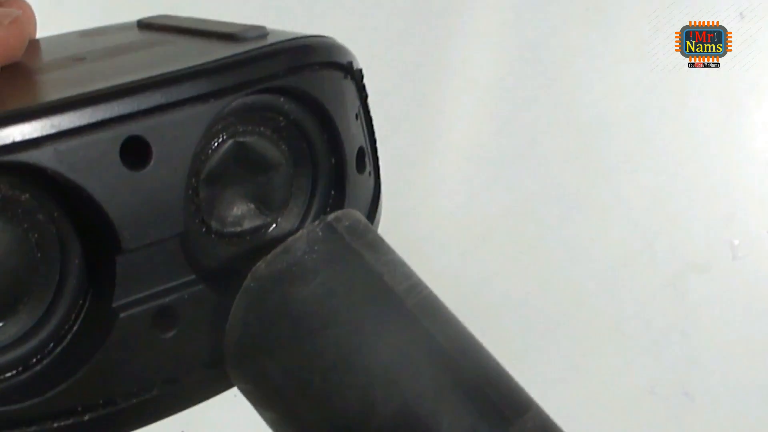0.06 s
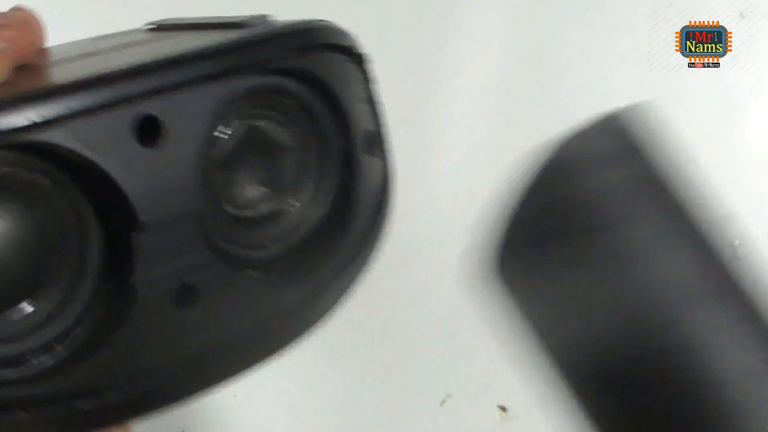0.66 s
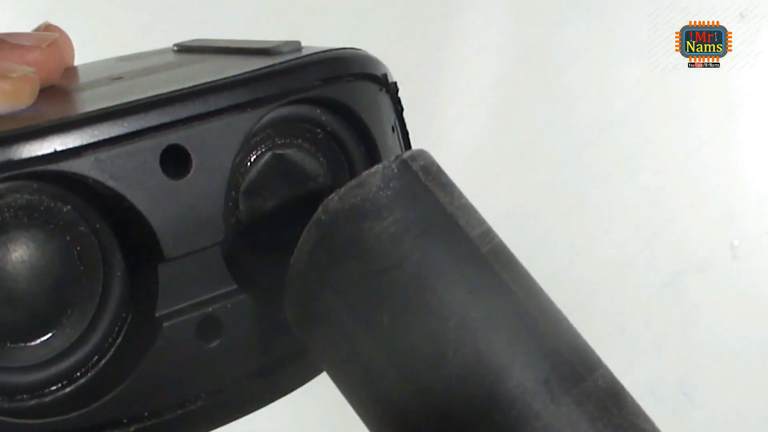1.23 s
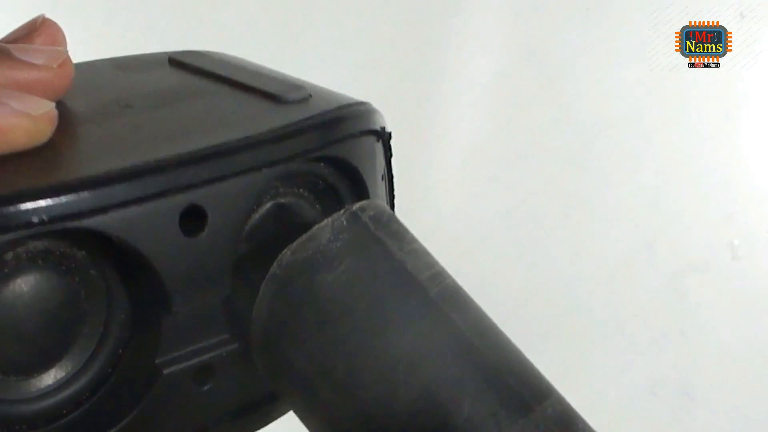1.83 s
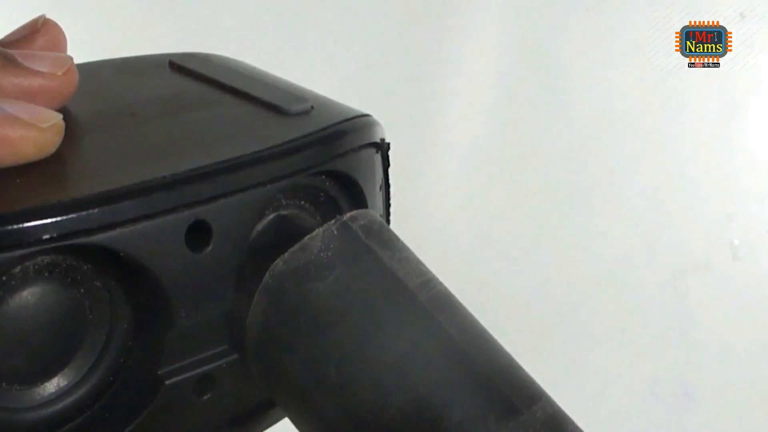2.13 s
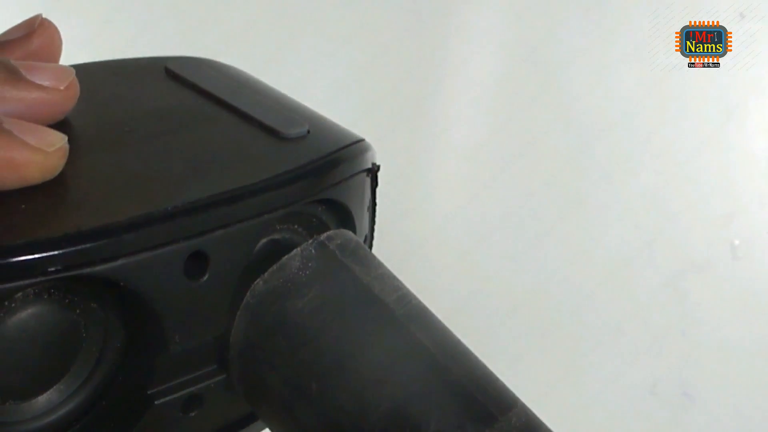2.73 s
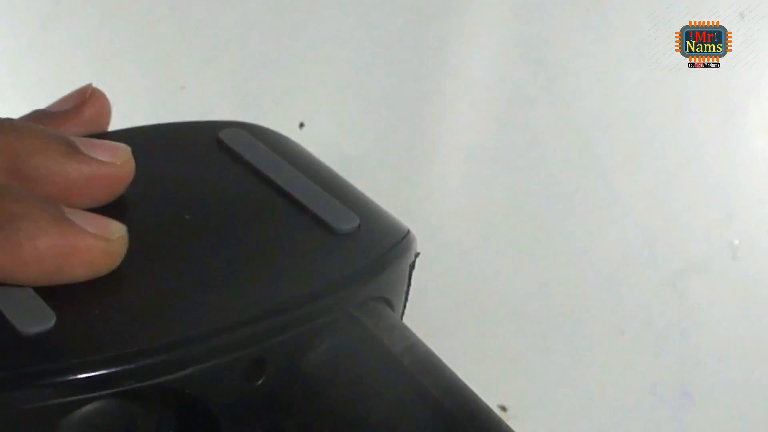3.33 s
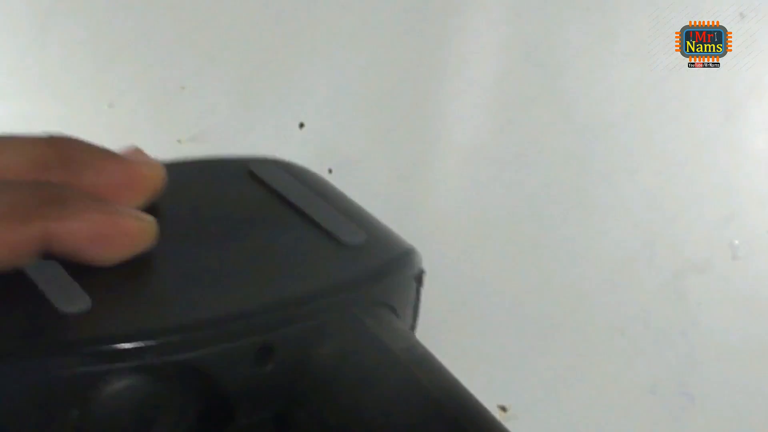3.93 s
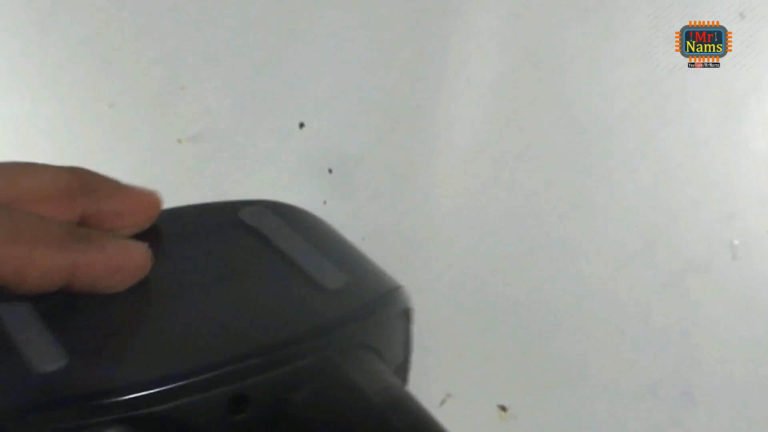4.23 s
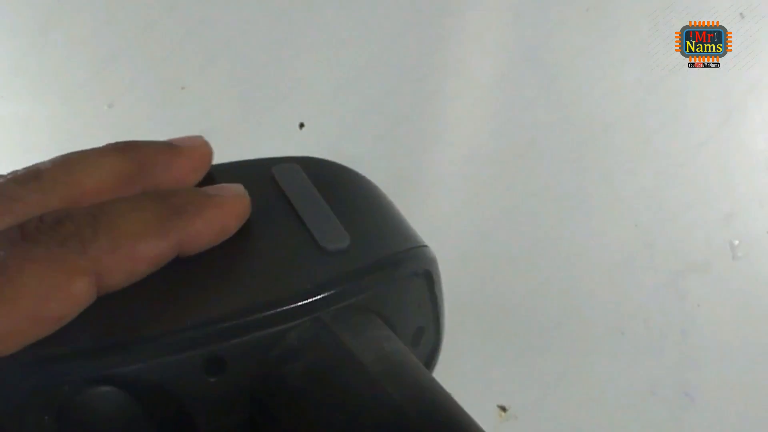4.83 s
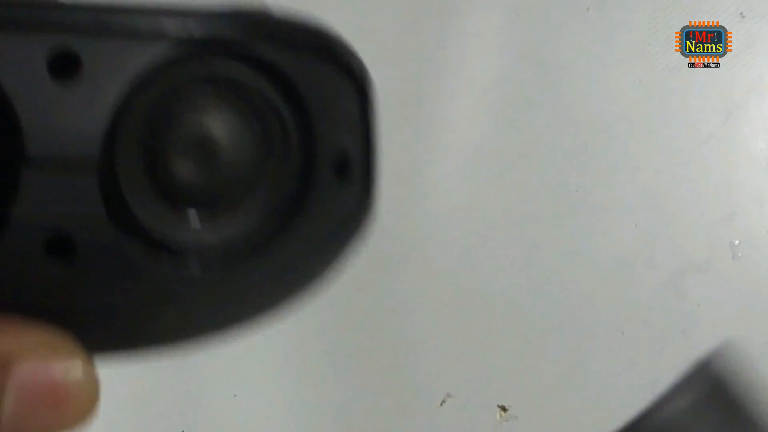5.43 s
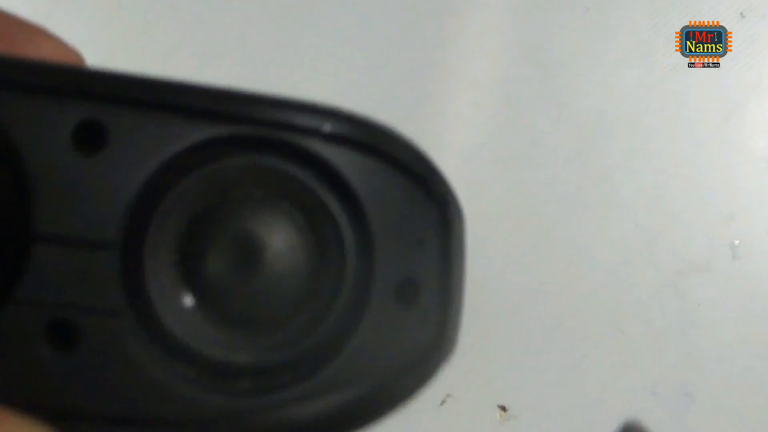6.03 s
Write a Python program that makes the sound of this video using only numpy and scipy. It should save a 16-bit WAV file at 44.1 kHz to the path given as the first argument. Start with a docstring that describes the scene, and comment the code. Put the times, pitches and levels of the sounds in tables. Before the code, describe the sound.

Air rushes through a vacuum pipe, sinking to a breathy whistle and rising motor hum when pressed against a speaker box, then returning.

```python
"""A vacuum cleaner's bare pipe roars over the motor's hum, with ragged spurts and hisses of air as its rim
is worked over the face of a small loudspeaker box. Turbulent flow excites the resonances of the pipe
and of the gaps between rim and box. Pressed flat, the pipe chokes: roar and hum sink, a slit whistles
and the unloaded motor speeds up, until the pipe is pulled away and the roar returns."""
import sys
import numpy as np
from scipy import signal
from scipy.fft import rfft, irfft, next_fast_len
from scipy.io import wavfile
from scipy.ndimage import map_coordinates

SR = 44100
rng = np.random.default_rng(int(sys.argv[2]) if len(sys.argv) > 2 else 0)


def materialize(psi):
    """Save the field psi as 16-bit PCM at rate SR to the path in sys.argv[1].

    A 1-D psi becomes a single channel; in a 2-D psi each row is a channel.
    """
    bounded = np.clip(np.atleast_2d(psi).T, -1, 1)
    quanta = np.round(bounded * 32767).astype(np.int16)
    wavfile.write(sys.argv[1], SR, quanta)


N = 271656
TIME = np.arange(N) / SR
SEAL_S, RELEASE_S = 2.925, 5.17  # the box seals the pipe, then frees it

# Air drawn freely into the pipe: t/s, relative level/dB
FLOW = [(0, -41.5), (.35, -43.5), (1.12, -38.5), (1.52, -40.5), (1.95, -46), (2.4, -49), (2.7, -54.5),
        (4.65, -56), (4.8, -63), (5.1, -59), (5.38, -48), (6.16, -43)]


def amp(db):
    """Amplitude ratio: a factor of ten for every 20 dB."""
    return 10 ** (np.asarray(db) / 20)


def unit(x):
    """Normalisation to an rms of 1."""
    return x / np.sqrt(np.mean(x ** 2) + 1e-20)


def curve(rows, column=1):
    """Linear interpolation of one column over time."""
    rows = np.asarray(rows)
    return np.interp(TIME, rows[:, 0], rows[:, column])


def passage(rows, fade_s=0.025):
    """Envelope from rows of t/s, f/Hz, level/dB, with exponential decay outside their span."""
    outside_s = np.maximum(np.maximum(rows[0][0] - TIME, TIME - rows[-1][0]), 0)
    return amp(curve(rows, column=2)) * np.exp(-outside_s / fade_s)


def held(start, end, attack_s, release_s):
    """Envelope with a linear rise, a hold and an exponential decay."""
    return np.clip((TIME - start) / attack_s, 0, 1) * np.exp(-np.maximum(TIME - end, 0) / release_s)


def power_sum(gains):
    """Incoherent sources add in power."""
    return np.sqrt(sum(gain ** 2 for gain in gains))


def wobble(rate_hz):
    """Slow noise: a spline through random values drawn at the given rate."""
    knots = rng.standard_normal(int(N * rate_hz / SR) + 4)
    return map_coordinates(knots, [TIME * rate_hz])


def eddies(depth_db, rate_hz):
    """Amplitude modulation: the random gain of a fluttering jet."""
    return amp(depth_db * wobble(rate_hz))


def filtered(x, response):
    """Linear filtering: the spectrum is multiplied by a frequency response."""
    size = next_fast_len(N + SR // 2)
    return irfft(rfft(x, size) * response(np.fft.rfftfreq(size, 1 / SR)), size)[:N]


def resonance(hz, centre, width):
    """Lorentzian curve: 1 at the centre, with the given full width at half height."""
    return 1 / (1 + (2 * (hz - centre) / width) ** 2)


def turbulence(spectrum, modes=()):
    """Source and filter: noise of rms 1 with a broad spectrum and narrow peaks and dips."""
    def response(hz):
        knot_hz, knot_db = np.transpose(spectrum)
        broad_db = np.interp(np.log(hz + 1), np.log(knot_hz + 1), knot_db)
        ripple_db = sum(db * resonance(hz, centre, width) for centre, width, db in modes)
        return amp(broad_db + ripple_db)
    return unit(filtered(rng.standard_normal(N), response))


def whistle(centre_hz, width_hz, low_cut_hz=150, high_cut_hz=10500):
    """Noise-driven resonance of rms 1 whose centre may glide."""
    hz, frame_s, noise = signal.stft(rng.standard_normal(N), SR, nperseg=512)
    hz = hz[:, None]
    centre_hz = np.interp(frame_s, TIME, np.broadcast_to(centre_hz, N))
    skirts = hz / (hz + low_cut_hz) / (1 + (hz / high_cut_hz) ** 10)
    response = resonance(hz, centre_hz, width_hz) ** 0.8 * skirts
    return unit(signal.istft(noise * response, SR, nperseg=512)[1][:N])


def scattering(x, echo_db=-10, t60_s=0.13, corner_hz=900):
    """Scattering: small objects nearby return short waves as brief echoes; long waves pass them by."""
    t = np.arange(SR // 8) / SR
    tail = rng.standard_normal(len(t)) * amp(-60 * t / t60_s) * (t > 0.002)
    short_waves = filtered(x, lambda hz: hz ** 2 / (hz ** 2 + corner_hz ** 2))
    return x + amp(echo_db) * signal.fftconvolve(short_waves, tail / np.linalg.norm(tail))[:N]


def shaft_hz(free_hz=505.8, rise_hz_per_db=0.2, sealed_rise_hz=57.9, spin_up_s=0.42, spin_down_s=0.2):
    """Load and inertia: a fan moving less air turns faster, and follows seal and release gradually."""
    t = TIME - 0.0603  # the motor answers late
    spun_up = 1 - np.exp(-(np.clip(t, SEAL_S, RELEASE_S) - SEAL_S) / spin_up_s)
    unloaded = spun_up * np.exp(-np.maximum(t - RELEASE_S, 0) / spin_down_s)
    flow_db = curve(FLOW)
    return free_hz + rise_hz_per_db * (flow_db.max() - flow_db) + sealed_rise_hz * unloaded


def motor(blade_count=12, blade_db=-22, hum_ceiling_db=-28.5, muffled_db=-8.5, exhaust_db=-41):
    """Rotor noise: a hum at the shaft rate, a faint blade-passing tone and exhaust through the housing."""
    # Exhaust spectrum: f/Hz, relative level/dB
    exhaust_spectrum = [(25, -42), (55, -47), (80, -0.5), (170, -15.5), (240, -2), (430, -5), (600, 0.5),
                        (1000, 1), (2000, 3), (3300, 3.5), (6000, 0.5), (8500, -6.5), (11000, -29),
                        (15000, -17)]
    # Housing peaks and dips: f/Hz, width/Hz, gain/dB
    housing_modes = [(74.6, 14, 4), (232, 30, 6.5), (325, 28, -5), (538, 65, 12.5), (626, 7.3, 7),
                     (730, 23, 6), (975, 53, -5), (1110, 64, 8.5), (1410, 160, -10), (1680, 120, -2),
                     (1860, 72, 10), (2780, 210, 1)]
    phase = 2 * np.pi * np.cumsum(shaft_hz()) / SR
    blades = amp(blade_db) * np.sin(blade_count * phase + wobble(150))
    open_db = np.minimum(curve(FLOW) + 14, hum_ceiling_db)  # the hum grows with the flow
    shut_in = held(3.01, 5.73, attack_s=0.05, release_s=0.083)  # until the mouth is back in the open
    hum = unit(np.sin(phase) + blades) * amp(open_db + muffled_db * shut_in)
    flutter = eddies(depth_db=0.65, rate_hz=18)
    return hum * flutter + amp(exhaust_db) * turbulence(exhaust_spectrum, housing_modes)


def box_leak(attack_s=0.12, release_s=0.09):
    """Cavity resonance: with the pipe blocked, suction draws air through the hollows of the box."""
    # Spells of leakage: start t/s, end t/s, level/dB
    leaks = [(2.93, 4.668, -38), (4.1, 4.62, -42), (4.772, 4.996, -41)]
    # Leak spectrum: f/Hz, relative level/dB
    spectrum = [(60, -22), (150, -13), (430, -14), (560, 2.5), (830, 3), (950, -10.5), (1450, -19),
                (1600, -1.5), (2300, 0), (2850, -3), (3400, 0), (4500, -25), (8000, -14), (9300, -14.5),
                (11000, -25)]
    # Box peaks and dips: f/Hz, width/Hz, gain/dB
    box_modes = [(557, 55, 5.5), (728, 25, 4), (975, 70, 2), (1080, 70, 6), (1390, 120, -8),
                 (1510, 130, 4.5), (2280, 220, 6), (2850, 200, -11), (3400, 300, 3), (3780, 200, -8),
                 (6600, 300, 12), (9500, 850, 5)]
    strength = power_sum(amp(db) * held(start, end, attack_s, release_s) for start, end, db in leaks)
    return strength * turbulence(spectrum, box_modes) * eddies(depth_db=0.95, rate_hz=25)


def mouth_whistle():
    """Flow-excited resonance: air sings over the lip of the freed pipe as the flow picks up."""
    # Resonance at the mouth: t/s, f/Hz, level/dB
    glide = [(5.24, 6800, -53), (5.45, 6800, -46), (5.6, 6245, -45.5), (5.85, 6300, -43.5),
             (6.16, 6360, -38.5)]
    return passage(glide) * whistle(curve(glide), width_hz=1100)


def gap_puffs():
    """Transient excitation: as the rim grips or lets go, each passing gap sounds its own resonance."""
    # Gaussian puffs: peak t/s, 1/e half-length/s, f/Hz, width/Hz, level/dB
    puffs = [(2.901, 0.0094, 1400, 900, -36), (2.911, 0.0099, 3400, 1200, -25),
             (2.901, 0.026, 4440, 1600, -28), (4.647, 0.06, 5520, 550, -30), (4.654, 0.058, 1970, 350, -34),
             (4.717, 0.097, 9200, 2200, -44.5), (5, 0.053, 5400, 1100, -39),
             (5.112, 0.036, 2950, 200, -37.5), (5.168, 0.027, 5500, 1800, -34),
             (5.179, 0.023, 1310, 400, -37), (5.183, .016, 2300, 1410, -32), (5.24, 0.056, 9300, 2200, -48)]
    return sum(amp(db) * np.exp(-((TIME - peak) / half_length) ** 2) * whistle(hz, width)
               for peak, half_length, hz, width, db in puffs)


def slit_whistle(gain_db=-2):
    """Slit resonance: a breathy whistle climbs as the gap under the pressed rim closes."""
    # Resonance of the slit: t/s, f/Hz, relative level/dB
    glide = [(2.96, 4490, -43), (3.28, 4740, -34.5), (3.364, 4350, -32.5), (3.744, 4520, -32),
             (4.086, 5650, -31.5), (4.26, 6100, -36.5), (4.56, 5650, -42)]
    strength = amp(gain_db) * passage(glide, fade_s=0.015)
    return strength * whistle(curve(glide), width_hz=1250) * eddies(depth_db=1.0, rate_hz=31)


def cone_pocket(arrival_s=0.8, centred_s=1.63, centred_db=-24.5, fall_db_per_s=6.5, low_cut_hz=100):
    """Cavity resonance: the draught excites the pocket between pipe and speaker cone until it seals."""
    # Pocket resonances: f/Hz, width/Hz, relative level/dB
    pocket_modes = [(3093, 830, 2.5), (4010, 360, -3), (5900, 740, -12)]

    def response(hz):
        peaks = sum(amp(db) * resonance(hz, centre, width) ** 0.87 for centre, width, db in pocket_modes)
        return peaks * hz / (hz + low_cut_hz)
    rush = unit(filtered(rng.standard_normal(N), response))
    aim_db = centred_db - fall_db_per_s * np.abs(TIME - centred_s)  # the pipe slides across the cone
    strength = amp(aim_db) * held(arrival_s, SEAL_S, attack_s=0.14, release_s=0.0046)
    return strength * rush * eddies(depth_db=0.37, rate_hz=74)


def edge_spurts(gain_db=-1, attack_s=0.012, release_s=0.023):
    """Vortex shedding: a ragged jet breaks into eddies at the edge of the box."""
    # Spurts of air: start t/s, end t/s, relative level/dB
    spurts = [(-.02, 0.516, -25), (0.035, 0.152, -20), (0.165, 0.252, -21.5), (.308, 0.335, -21.5),
              (4.581, 4.697, -31.5), (4.96, 5.03, -37.5), (5.1, 5.2, -33)]
    # Jet spectrum: f/Hz, relative level/dB
    spectrum = [(700, -40), (1400, -17), (2000, -5), (2500, -2.5), (3200, -0.5), (3600, -9), (4000, -6.5),
                (4500, -17), (5700, -14), (6800, -32), (12000, -52)]
    strength = power_sum(amp(db) * held(start, end, attack_s, release_s) for start, end, db in spurts)
    return amp(gain_db) * strength * turbulence(spectrum) * eddies(depth_db=1.46, rate_hz=150)


def rim_hiss(gain_db=6):
    """Turbulence at a constriction: the rim hisses with the flow, and more when close to the box."""
    # The rim nears or presses on the box: start t/s, end t/s, attack/s, release/s, relative level/dB
    presses = [(-.02, 2.915, .02, .01, -45.5), (-.02, 0.57, .02, .05, -44), (.79, 2.915, 0.074, .01, -43),
               (1.95, 2.915, 0.35, .01, -44), (3.08, 5.19, .2, .06, -45), (3.15, 4.7, .12, .08, -48.5),
               (4.24, 4.7, .08, .05, -43.5), (4.95, 5.16, 0.13, .03, -41)]
    # Rim hiss spectrum, with a narrow silent band near 11.8 kHz that the rim does not cause:
    # f/Hz, relative level/dB
    notched_spectrum = [(900, -44), (1600, 3.5), (2300, -1), (3000, -2.5), (5000, 1.5), (6500, -0.5),
                        (7600, -4.5), (8500, -8), (10000, -13), (11000, -17), (11800, -82), (13200, -17.5),
                        (15500, -17.5)]
    pressed = [amp(db) * held(start, end, attack, release) for start, end, attack, release, db in presses]
    free_flow, seepage = amp(curve(FLOW) - 6), amp(-54)
    strength = power_sum(pressed + [free_flow, seepage])
    return amp(gain_db) * strength * turbulence(notched_spectrum) * eddies(depth_db=1.0, rate_hz=100)


def pipe_roar(over_flow_db=12, echo_db=-13, echo_corner_hz=3000, sound_m_per_s=343):
    """Duct resonance and interference: flow excites pipe and hose; the box's echo sweeps a comb filter."""
    # Roar spectrum: f/Hz, relative level/dB
    spectrum = [(30, -52), (55, -42), (100, -21), (135, -16.5), (190, -17), (250, -7.5), (320, -3.5),
                (430, -2), (520, 3), (680, 0.5), (1000, 1), (1500, -1), (2800, -6.5), (5000, -20),
                (7500, -28.5), (10500, -68), (15000, -63)]
    # Peaks and dips of pipe and hose: f/Hz, width/Hz, gain/dB
    duct_modes = [(324.7, 15.6, 9.5), (630, 27, 3.5), (667, 60, -1), (774, 38, 3), (958, 24, -7),
                  (1120, 40, -5), (1291, 45, 4), (1395, 50, 0.5), (2100, 40, -1), (2480, 49, -1),
                  (2780, 50, -7), (3530, 290, -1.5), (6140, 90, 4), (6660, 380, -19)]
    # Reflection off the moving box: t/s, extra path/m
    echo_path = [(0, 0.043), (.55, 0.093), (.72, 0.13), (1, 0.032), (2.9, 0.034), (5.2, 0.038), (5.3, 0.2),
                 (5.7, 0.19), (6.16, 0.16)]
    roar = turbulence(spectrum, duct_modes)
    treble = filtered(roar, lambda hz: hz ** 2 / (hz ** 2 + echo_corner_hz ** 2))
    lag_samples = curve(echo_path) / sound_m_per_s * SR
    echo = map_coordinates(treble, [np.arange(N) - lag_samples], mode="nearest")
    strength = amp(curve(FLOW) + over_flow_db)
    return strength * (roar + amp(echo_db) * echo) * eddies(depth_db=0.88, rate_hz=25)


def scene():
    """Superposition: the motor and the scattered air sounds add at one point, alike in both channels."""
    background = motor()
    airflow = pipe_roar() + rim_hiss() + edge_spurts() + cone_pocket()
    airflow += slit_whistle() + box_leak() + mouth_whistle() + gap_puffs()
    mono = background + scattering(airflow)
    return np.array([mono, mono])


def record(dry, top_hz=15800):
    """Band limiting: an ideal low-pass filter removes the highest treble."""
    return np.array([filtered(channel, lambda hz: hz < top_hz) for channel in dry])


dry = scene()
out = record(dry)
materialize(out)
```